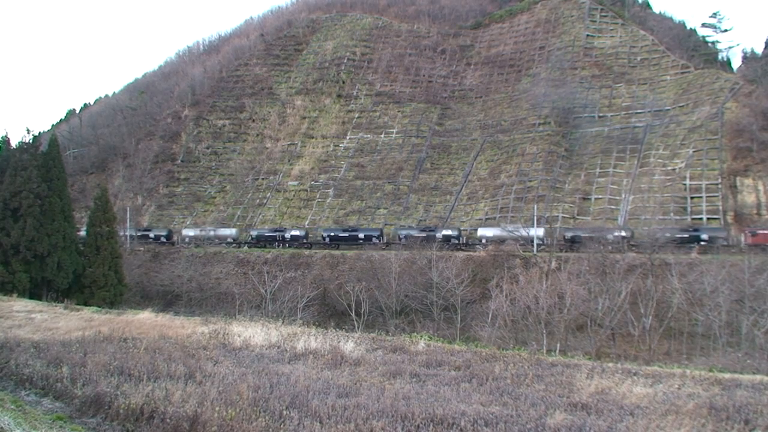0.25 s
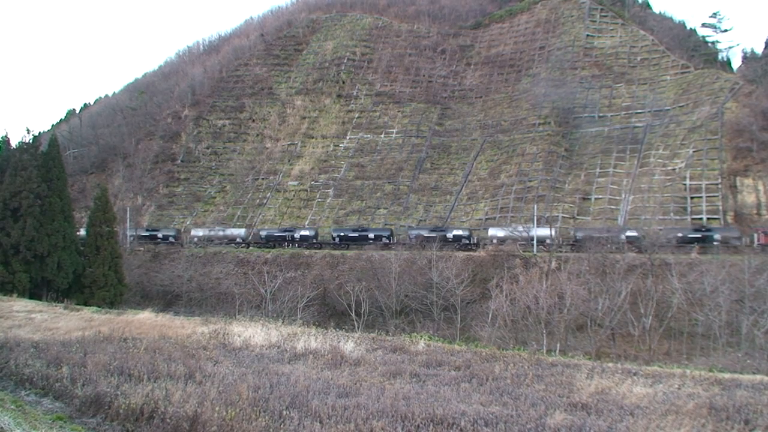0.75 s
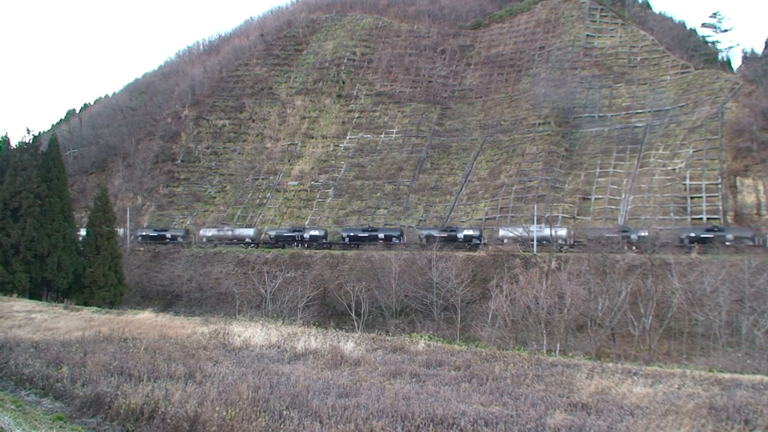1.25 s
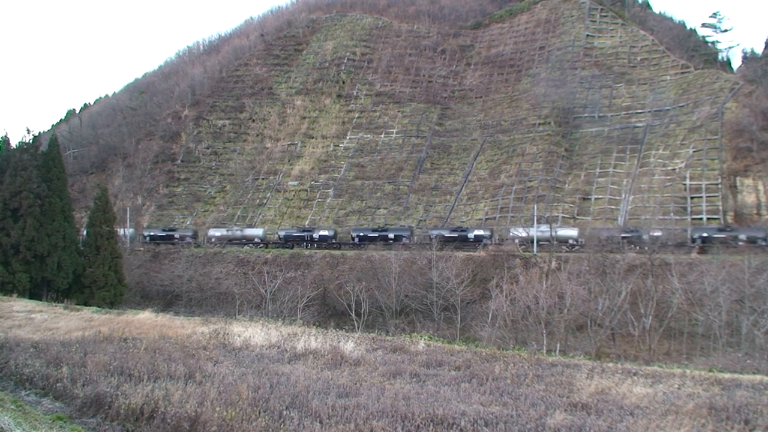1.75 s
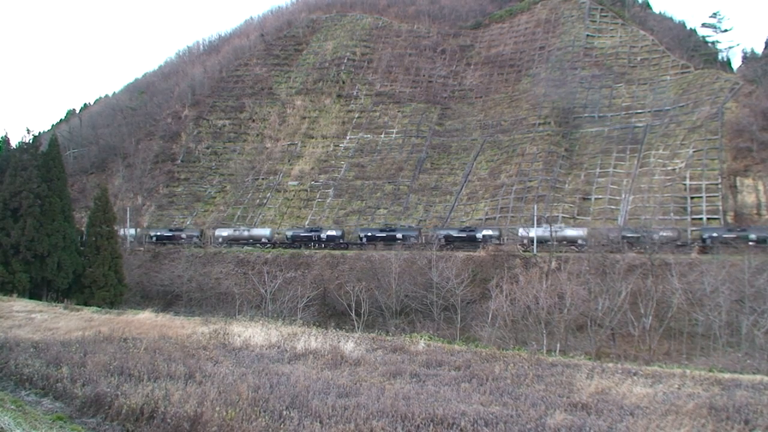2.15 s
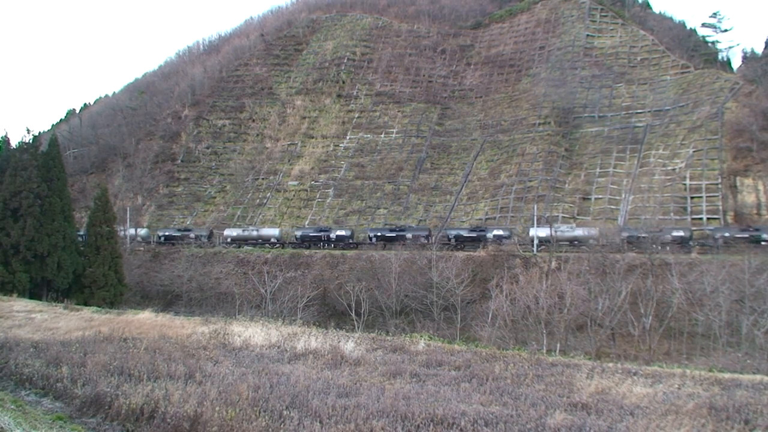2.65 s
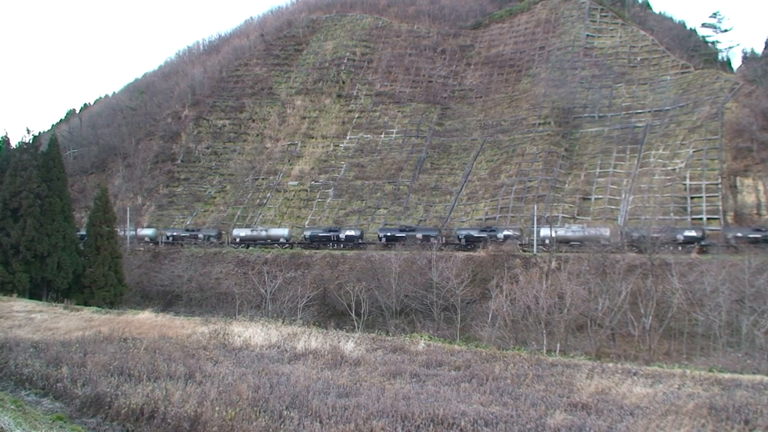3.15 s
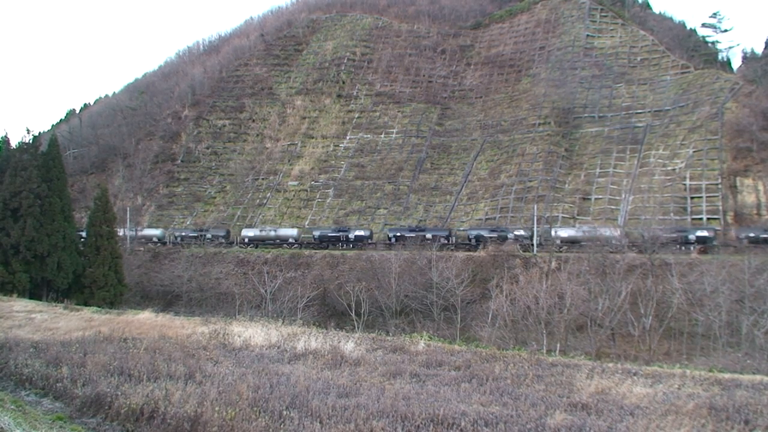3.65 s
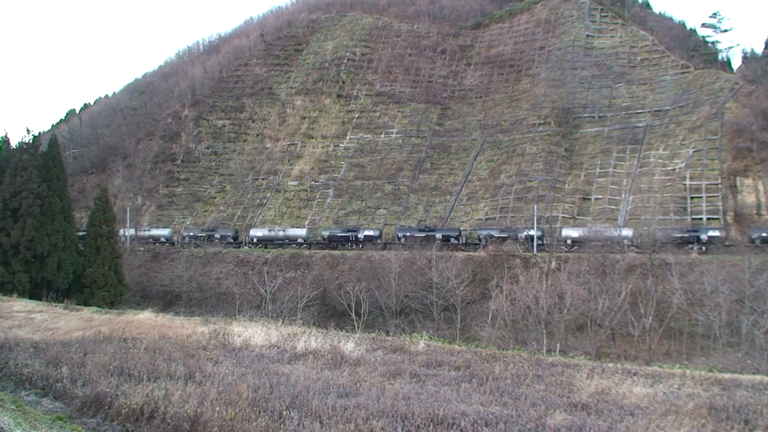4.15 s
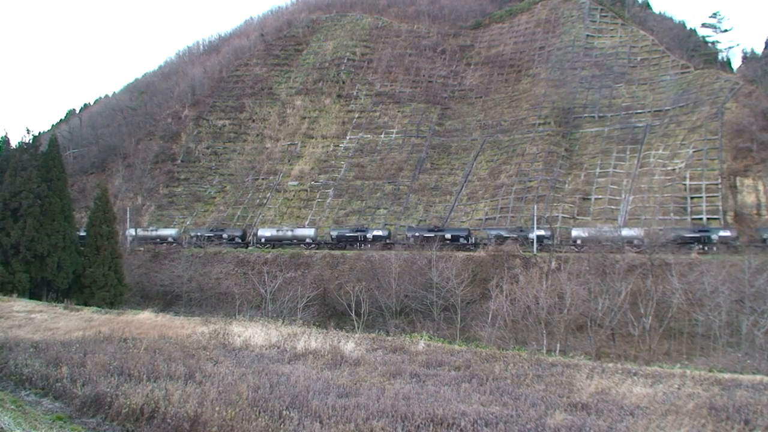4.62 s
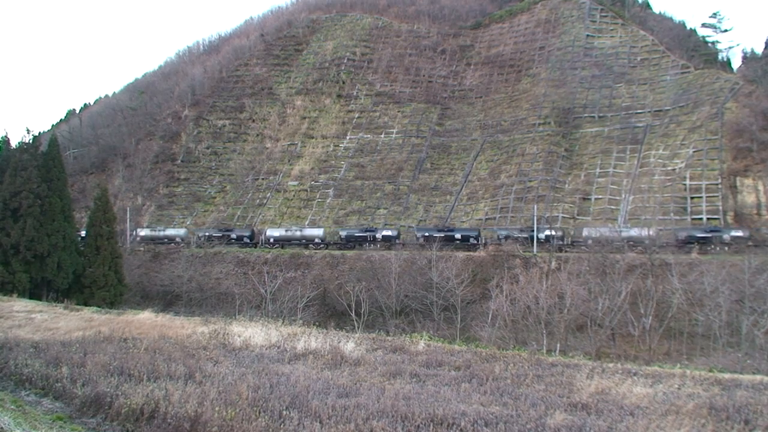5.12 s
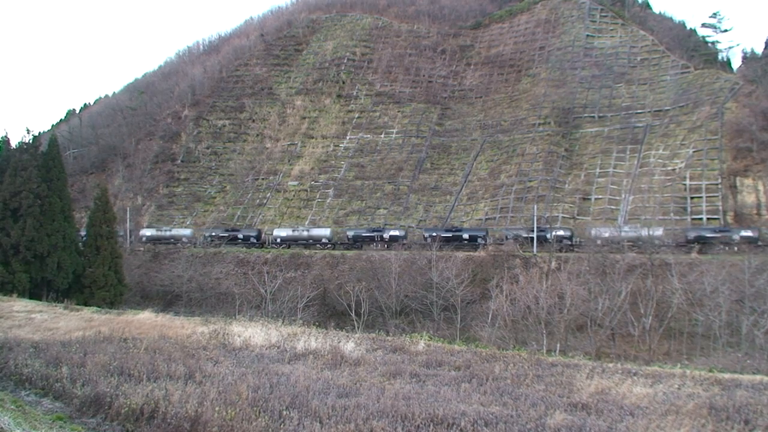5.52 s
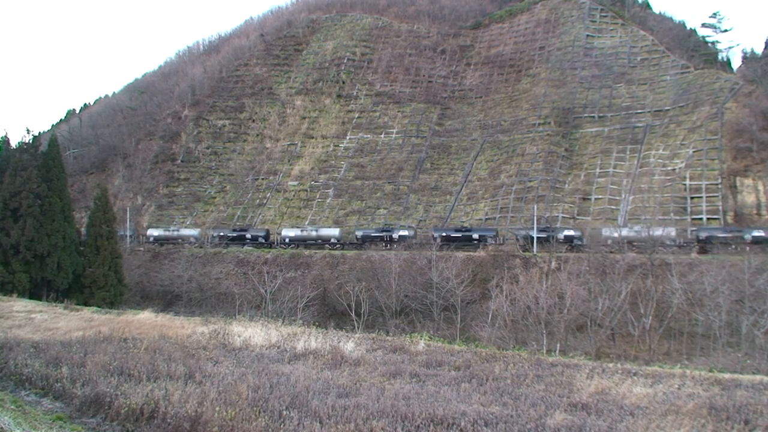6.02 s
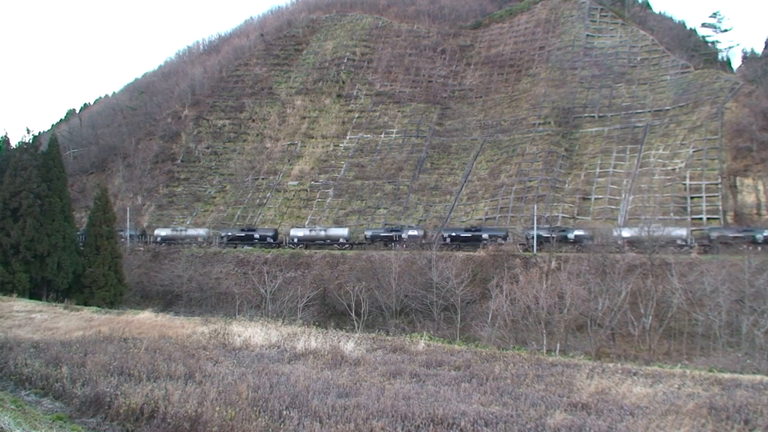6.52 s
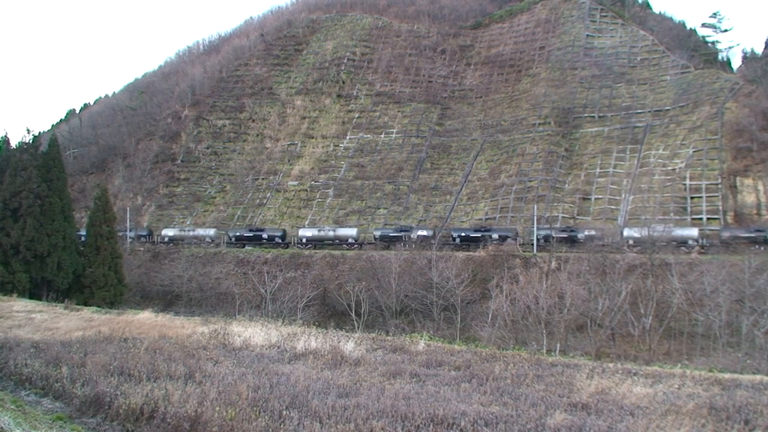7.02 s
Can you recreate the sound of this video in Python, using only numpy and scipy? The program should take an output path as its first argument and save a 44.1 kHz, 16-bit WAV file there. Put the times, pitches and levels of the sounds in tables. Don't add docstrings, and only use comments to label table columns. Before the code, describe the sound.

Outdoors across a valley, a slow goods train starts with a loud, shrill flange squeal, rough and ringing with many high steel tones. It breaks off into sharp coupling ticks and brief slips, then a second squeal bites and holds. When it stops abruptly, a quieter steady rolling grind remains with irregular metallic knocks, a diesel pulse and occasional rail joint ticks. Distant mono microphone, slight hillside echo.

```python
import sys
import numpy as np
from scipy import signal
from scipy.fft import rfft, irfft, next_fast_len
from scipy.io import wavfile
from scipy.ndimage import uniform_filter1d, map_coordinates

SR = 44100
rng = np.random.default_rng(int(sys.argv[2]) if len(sys.argv) > 2 else 0)


def pcm_store(signal):
    levels = np.round(np.clip(np.atleast_2d(signal), -1, 1) * 32767)
    wavfile.write(sys.argv[1], SR, levels.astype(np.int16).T)


def gain_from_db(level_db):
    decades = np.asarray(level_db, float) / 20
    return 10 ** decades


N = 321048
T = np.arange(N) / SR

# time in seconds, pressure in dB, brightness in dB.
FLANGE_PRESSURE = [
    [(0.0, -18, -21), (0.07, -20.5, -12), (0.2, -21, -16.5), (0.35, -19, -11.5), (0.51, -20.5, -16),
     (1.03, -23.5, -12.5), (1.22, -24, -15.5), (1.27, -21.5, -14), (1.415, -23, -17.5)],
    [(1.655, -39.5, -17), (1.755, -27, -13.5), (1.927, -55, -9), (1.949, -51, -24), (1.969, -26.5, -9),
     (2.005, -31.5, -25), (2.11, -46, -20)],
    [(2.115, -49, -17), (2.149, -31, -12), (2.213, -24, -16.5), (2.291, -23, -17), (2.707, -22, -14.5),
     (2.833, -24.5, -14), (3.155, -21.5, -14), (3.477, -21.5, -12.5), (3.525, -44, -25)],
]
# frequency in Hz, level in dB per Hz.
SCRAPE_COLOUR = [
    [(530, -42.5), (900, -23), (1130, -21.5), (1670, -16), (2150, 1), (2390, -7.5), (3580, -9), (4180, 2.5),
     (4660, -7), (5310, 5), (5910, -7), (6350, 0), (8550, -5.5), (15500, -38)],
    [(530, -42), (900, -21.5), (1120, -17.5), (1750, -15), (2120, 5), (2420, -6.5), (3670, -10.5),
     (4130, -1.5), (4600, -13.5), (5240, -1.5), (5840, -9.5), (7320, -10), (12800, -36), (15500, -49)],
]
# frequency in Hz, level in dB per Hz.
SLIP_COLOUR = [(880, -54), (1500, -14), (2030, 5), (4610, -18), (5290, -14), (6070, -23.5), (13000, -42),
               (15500, -53)]
# centre in Hz, width in Hz, level in dB.
MODE_GAPS = [
    (3680, 200, -1.5),
    (5870, 150, -2),
    (7750, 130, -4.5),
    (8800, 150, -4),
    (10000, 130, -4),
    (10450, 150, -4),
    (11350, 230, 1),
]
# frequency in Hz, level in dB.
WHEEL_MODES = [
    [(2837, -42), (4355, -63), (4990, -53), (6164, -59), (7214, -57), (7381, -50.5), (7461, -47),
     (8506, -45), (9609, -52), (10702, -53), (11779, -59.5), (12839, -66), (13544, -69), (13878, -70),
     (14045, -67)],
    [(5534, -56), (6449, -68), (7300, -64), (8064, -68), (8371, -60), (9464, -59), (11283, -67),
     (12608, -67)],
    [(2676, -49), (2826, -52), (2885, -53), (3370, -55), (4156, -51), (4317, -55), (5367, -54), (5712, -62),
     (6869, -51), (8113, -65), (8366, -49.5), (9232, -58), (9458, -56), (10261, -62), (10524, -61),
     (11574, -68), (14600, -72)],
]
SINGING_HZ = [
    (1126, 3014, 3316, 4076, 5166, 5453, 6288),
    (5130,),
    (3007, 4037, 5125, 6211, 7290),
]
# peak time in seconds, peak in dB, fade in seconds.
SINGING_FIRST = [
    [(0.078, -29, 0.062), (0.156, -30.5, 0.038), (0.664, -26, 0.01), (1.107, -36, 0.023)],
    [(0.148, -32, 0.03), (0.202, -27, 0.019), (0.271, -30, 0.03), (0.399, -23, 0.037), (0.696, -33, 0.052),
     (0.75, -32, 0.091), (1.02, -22, 0.015), (1.105, -41, 0.043)],
    [(0.084, -34, 0.024), (0.477, -38, 0.026), (0.66, -33, 0.074), (1.088, -39, 0.054), (1.127, -40, 0.09),
     (1.239, -32, 0.09)],
    [(0.094, -23, 0.032), (0.162, -23, 0.071), (0.204, -25, 0.065), (0.271, -21, 0.027),
     (0.315, -32, 0.081), (0.373, -28, 0.097), (0.467, -29, 0.12), (0.56, -29, 0.05), (0.641, -23, 0.021),
     (0.736, -32, 0.071), (0.78, -21.5, 0.042), (0.834, -29.5, 0.07), (0.924, -24, 0.022)],
    [(0.015, -27, 0.03), (0.138, -22.5, 0.057), (0.196, -22, 0.032), (0.393, -35, 0.025),
     (0.453, -39, 0.046), (0.599, -34, 0.09), (0.641, -38, 0.046), (1.056, -27.5, 0.048),
     (1.127, -30, 0.026)],
    [(0.152, -37, 0.075), (0.311, -38, 0.025), (0.595, -39, 0.028), (0.828, -29, 0.018), (0.922, -30, 0.09)],
    [(0.096, -26, 0.026), (0.156, -28, 0.06), (0.214, -40, 0.09), (0.257, -41, 0.081), (0.355, -35, 0.063),
     (0.405, -30, 0.038), (0.914, -42, 0.071)],
]
SINGING_SLIPS = [
    [(1.7, -40, 0.049), (1.78, -42, 0.068), (1.97, -33, 0.016)],
]
SINGING_SECOND = [
    [(2.251, -34, 0.079), (2.325, -19, 0.013), (2.393, -19.5, 0.018), (2.45, -30, 0.1), (2.714, -25, 0.043),
     (3.049, -32, 0.037), (3.422, -38, 0.038), (3.464, -31, 0.044)],
    [(2.221, -28.5, 0.054), (2.289, -41, 0.04), (2.425, -31, 0.044), (2.494, -28, 0.067),
     (2.648, -21.5, 0.019), (2.744, -24, 0.066), (2.826, -30.5, 0.079), (2.905, -36, 0.05),
     (3.055, -30, 0.04), (3.203, -24, 0.042), (3.291, -28, 0.026), (3.416, -29, 0.033), (3.46, -38, 0.072)],
    [(2.263, -23.5, 0.09), (2.334, -16.5, 0.062), (2.425, -22.5, 0.03), (2.488, -28, 0.029),
     (2.548, -24, 0.012), (2.594, -36, 0.048), (2.744, -31.5, 0.09), (2.834, -35, 0.048),
     (2.921, -25.5, 0.021), (3.117, -33, 0.068), (3.161, -23, 0.015)],
    [(2.456, -34, 0.15), (2.614, -30, 0.09), (2.72, -38, 0.071), (2.792, -40, 0.06), (2.969, -34, 0.029),
     (3.125, -32, 0.018), (3.281, -33, 0.032), (3.416, -30, 0.024), (3.494, -32.5, 0.042)],
    [(3.147, -37, 0.039), (3.414, -40, 0.036), (3.474, -34, 0.06)],
]
# peak time in seconds, peak in dB, fade in seconds.
HOWL_FLARES = [(0.066, -18, 0.035), (.27, -34, 0.026), (.51, -19, 0.91), (1.11, -28, 0.12),
               (1.264, -26, 0.073), (1.41, -25, 0.11), (1.969, -16.5, 0.014), (2.11, -8, 0.018),
               (2.291, -14, 0.03), (2.451, -16, 0.062), (2.62, -27, 0.18), (2.707, -14.5, 0.042),
               (2.963, -19, 0.16), (3.213, -30, 0.016), (3.5, -23, 0.25)]
# time in seconds, pitch in Hz, level in dB.
FLANGE_CHIRPS = [(0.054, 2650, -21), (0.07, 2194, -15), (0.082, 3320, -27), (0.12, 2060, -22),
                 (0.142, 2630, -25), (0.182, 2500, -24), (0.263, 2630, -21), (0.285, 2215, -19.5),
                 (0.319, 2638, -32), (0.321, 2203, -23), (0.359, 2780, -35), (0.375, 2035, -19),
                 (0.419, 2050, -21), (0.477, 2057, -16), (0.477, 3280, -29), (0.525, 2218, -21),
                 (0.527, 2810, -23), (0.549, 2515, -19), (0.587, 2105, -22), (0.595, 2640, -28),
                 (0.605, 2780, -29), (0.637, 2760, -22), (0.639, 2150, -24), (0.66, 3340, -29),
                 (0.698, 2560, -20), (0.75, 3060, -25), (0.846, 2496, -20), (0.908, 2420, -28),
                 (1.008, 2580, -22), (1.086, 3316, -30), (1.094, 2820, -21), (1.098, 2500, -23),
                 (1.127, 3316, -25), (1.241, 2630, -26), (1.275, 2220, -14), (1.325, 2530, -23),
                 (1.357, 2720, -26), (2.243, 2470, -24), (2.255, 2907, -24), (2.263, 2210, -21),
                 (2.293, 2140, -23), (2.353, 2670, -23), (2.401, 2110, -18.5), (2.428, 2950, -25),
                 (2.45, 2143, -32), (2.46, 2440, -25), (2.482, 2060, -18), (2.526, 2036, -21.5),
                 (2.576, 2870, -27), (2.61, 2190, -18), (2.654, 2860, -24), (2.674, 2530, -27),
                 (2.714, 2085, -16), (2.953, 2580, -26), (2.967, 2080, -26), (3.079, 2650, -24),
                 (3.117, 3252, -25), (3.163, 2659, -22.5), (3.213, 2190, -22.5), (3.396, 3190, -23)]
# time in seconds, peak in dB, low clank in dB.
COUPLING_TICKS = [(1.51, -32.5, 8), (1.563, -26, -14), (1.6691, -27, -10), (1.695, -25, -9),
                  (1.74, -16, -13), (1.8128, -21, 2.5), (1.8831, -30, -2), (1.958, -29, 6),
                  (1.966, -14.5, 0), (2.0786, -23.5, 1), (2.127, -16, -20), (2.149, -9.5, -19),
                  (2.1899, -11, -6), (3.5, -26, -6), (3.714, -20.5, 0), (5.3373, -33, -6), (5.441, -31, 5),
                  (5.6545, -25.5, -6), (5.8606, -24, 3.5), (6.011, -27.5, -10), (6.1888, -28.5, 8),
                  (6.3225, -30, -6)]
# frequency in Hz, level in dB.
TICK_COLOUR = [(1000, -33), (3000, -30), (5000, -13.5), (5700, -8), (7000, -11.5), (8500, -24),
               (10000, -32), (15500, -72)]
# time in seconds, rolling in dB, knock in dB.
TRAIN_LEVELS = [(0.0, -33.5, -48), (0.4, -34, -32.5), (0.83, -32, -27.5), (1.15, -34, -25),
                (1.34, -31.5, -35), (2.0, -33, -35), (2.64, -33.5, -30.5), (3.6, -34.5, -31),
                (4.58, -34, -39.5), (4.87, -33, -35.5), (5.21, -34.5, -42), (5.8, -34.5, -36),
                (6.51, -34.5, -38.5), (7.28, -34.5, -41)]
# frequency in Hz, level in dB per Hz.
GRIND_COLOUR = [(15, -68), (30, -48), (180, -23.5), (410, -10), (600, -11.5), (900, -11), (1700, -15.5),
                (2700, -13.5), (4260, -21.5), (6200, -35.5), (15500, -61)]
# frequency in Hz, width in Hz, level in dB.
RAIL_MODES = [(606, 61, 5), (1184, 213, 9), (2147, 114, 17)]
# frequency in Hz, width in Hz, level in dB, knock decay t60 in seconds.
CASING_MODES = [(1182, 145, -8.5, 0.19), (2128, 125, 1, 0.068), (2850, 69, -9.5, 0.16),
                (3380, 520, -17, 0.21), (4130, 660, -15.5, 0.073)]
CYLINDER_DB = [
    [1, 2, 1.1, -0.35, -0.3, 1.1],
    [0, 5.3, 7.4, -1.5, 1, 1.9],
]
# start in seconds, peak in dB, casing pitch in Hz.
HARD_KNOCKS = [(1.5975, -18, 2210), (1.6394, -18, 2100), (1.9123, -9.5, 2130), (1.9567, -12, 2190),
               (2.0265, -21, 2100), (3.5153, -18, 2150), (3.5458, -19, 2100), (3.6974, -21, 2180),
               (3.7368, -27, 2090), (3.7832, -27, 2100), (3.8805, -14, 2150), (3.9688, -15.5, 2190),
               (4.0057, -24, 2300), (4.0596, -21, 2085), (4.096, -21, 2280), (4.1439, -18, 2100),
               (4.1953, -22, 2100), (4.2397, -20, 2110), (4.2836, -14.5, 2100), (4.326, -19, 2180),
               (4.3664, -19, 2245), (4.4118, -21, 2120), (4.6163, -18, 2150), (4.6812, -21, 2080),
               (4.7211, -25, 2180), (4.9506, -21, 2120), (5.0339, -18, 2165), (5.2973, -25, 2120),
               (5.42, -22, 2150), (5.6091, -25, 2280), (5.663, -16, 2160), (5.7493, -19, 2100),
               (6.0241, -19, 2035), (6.1523, -17, 2080), (6.1913, -23, 2200), (6.2401, -16, 2170),
               (6.288, -21, 2120), (6.4646, -14, 2170), (6.6866, -17, 2070), (6.7784, -14, 2130),
               (6.8862, -19, 2130), (6.9421, -17.5, 2160), (7.0004, -14, 2170), (7.0463, -21, 2120),
               (7.0902, -25, 2200), (7.2249, -19, 2120), (5.8477, -21, 2060), (5.978, -19, 2150)]
# start in seconds, peak in dB, casing pitch in Hz.
LOW_KNOCKS = [(3.8333, -21, 1300), (3.9171, -23, 1310), (4.0812, -27, 1110), (4.1872, -25, 1140),
              (4.3831, -29, 1270), (4.7637, -23, 1185), (4.9807, -18, 1183), (5.0715, -27, 1170),
              (5.2496, -20, 1120), (5.293, -19, 1140), (5.3383, -27, 1280), (5.7484, -31, 1070),
              (6.5796, -19.5, 1203), (6.837, -18.5, 1217), (6.8678, -21, 1167), (7.0094, -23, 1170),
              (7.057, -28, 1220), (7.0935, -21, 1167)]
# pitch in Hz, then swells of peak time in seconds, peak in dB, fade in seconds.
BODY_HUMS = [
    (445, [(1.77, -39.5, 0.052), (2.5, -40.5, 0.33), (2.95, -40, 0.083)]),
    (429, [(4.77, -43, 0.068), (5.0, -40.5, 0.3), (5.3, -41, 0.27), (5.65, -45, 0.045), (6.05, -47.5, 0.98), (6.6, -52, 0.058)]),
    (4100, [(1.27, -31, 0.058), (1.35, -30, 0.037), (1.44, -38, 0.093)]),
    (4037, [(3.52, -37, .1)]),
    (8366, [(3.12, -42, .1), (3.33, -41, .07), (3.45, -43, .07)]),
    (8506, [(.37, -37, .05), (.85, -41, .15), (1.04, -44, .08), (1.41, -46, .06)]),
    (5160, [(5.68, -52, .05), (5.89, -51, .08), (6.02, -51, 0.07)]),
    (12602, [(3.52, -63, .12)]),
]
# peak time in seconds, peak in dB, fade in seconds.
FLANGE_FIZZ = [(5.306, -62, .12), (5.95, -65, 0.2), (6.322, -59, 0.03)]
# frequency in Hz, t60 in seconds.
HILL_DECAY = [(200, 0.91), (2000, 1), (8000, 0.58), (15000, 0.58)]
# peak time in seconds, peak in dB, fade in seconds.
WIND_GUSTS = [(.83, -49, 0.11), (1.1, -37, 0.08), (1.33, -37.5, 0.085), (1.56, -43.5, 0.13),
              (3.51, -57, .1), (3.71, -65, 0.046), (5.13, -64, .07), (6.51, -57, .25)]
# frequency in Hz, level in dB.
WIND_COLOUR = [(25, -50), (60, -11), (110, -3.5), (200, 0.5), (400, -11), (800, -63)]

HOWL_FLOOR_DB, HOWL_SPILL_DB = -30, -16.5
FLICKER_DB = 1.3
RISE_SHARE = 0.48
CHIRP_S, CHIRP_SAG_HZ_PER_S = 0.01, 1300
TOP_EDGE_DB, TOP_FOLLOWS = -34.5, 0.63
JOINTS_FROM_S = 3.6
CRACK_DB, CRACK_T60 = -20, 0.014
THUMP_DB, THUMP_T60 = -20, 0.09
FIRING_HZ, FIRST_S = 22.41, 0.031
FIZZ_HZ, FIZZ_WIDE_HZ = 8270, 250
BREEZE_DB = -92


def unit(x):
    return x / np.sqrt(np.mean(x ** 2) + 1e-20)


def along(points, hz):
    f, v = np.transpose(points)
    return np.interp(np.log(hz + 1), np.log(f + 1), v)


def gains(rows):
    s, *columns = np.transpose(rows)
    since_start = T - s[0] + (s[0] < 1e-3)
    until_end = s[-1] - T + (s[-1] > T[-1] - 1e-2)
    edge = np.clip(np.minimum(since_start, until_end) * 50, 0, 1)
    return [edge * gain_from_db(np.interp(T, s, c)) for c in columns]


def swells(rows, order=1):
    s, db, fade = np.transpose(rows)[..., None]
    coarse = T[::64]
    late = (coarse - s) / np.abs(fade)
    each = gain_from_db(db - 10 * np.maximum(late, -late / RISE_SHARE))
    return np.interp(T, coarse, (each ** order).sum(0) ** (1 / order))


def wobble(rate):
    coarse = T[::64]
    knots = rng.standard_normal(int(N * rate / SR) + 4)
    return np.interp(T, coarse, map_coordinates(knots, [coarse * rate]))


def filtered(x, response):
    m = next_fast_len(N + SR // 4)
    return irfft(rfft(x, m) * response(np.fft.rfftfreq(m, 1 / SR)), m)[:N]


def band(x, lo_hz, hi_hz):
    def response(hz):
        return 1 / (1 + (lo_hz / (hz + 1)) ** 12) - 1 / (1 + (hi_hz / (hz + 1)) ** 12)
    return filtered(x, response)


def modes(rows):
    def response(f):
        return sum((-1) ** k * g * 1j * f * w / (c * c - f * f + 1j * f * w)
                   for k, (c, w, g) in enumerate(rows))
    return response


def rush(spectrum, patchy_db, size=(4, 8)):
    z = signal.stft(rng.standard_normal(N + 1024), nperseg=1024)[2]
    field = uniform_filter1d(rng.standard_normal(z.shape), size=size[0], axis=0)
    field = uniform_filter1d(field, size=size[1], axis=1)
    x = signal.istft(z * gain_from_db(patchy_db * unit(field)), nperseg=1024)[1][:N]
    return filtered(x, lambda hz: gain_from_db(along(spectrum, hz)))


def tone(hz, blur_hz):
    return np.sqrt(2) * np.sin(2 * np.pi * np.cumsum(hz + blur_hz * wobble(24.89)) / SR)


def bursts(times, dbs, t60, rise=0.00031):
    hits = np.zeros(N)
    hits[np.round(np.asarray(times) * SR).astype(int)] = gain_from_db(dbs)
    fall = signal.lfilter([1], [1, -gain_from_db(-60 / (t60 * SR))], hits)
    keep = np.exp(-1 / (rise * SR))
    return rng.standard_normal(N) * signal.lfilter([1 - keep], [1, -keep], fall)


def squeal(rows, colour, wheel, low_db, sing_hz, sing):
    mid, bright = gains(rows)
    high = mid * bright
    rasp = scrape(rows, colour, mid, high, low_db)
    wheel = [m for m in wheel if all(abs(m[0] - hz) > 20 for hz in sing_hz)]
    lower = rung([m for m in wheel if m[0] < 7000], mid, t60=0.45, beat_db=4.0, blur_hz=6.7)
    upper = rung([m for m in wheel if m[0] >= 7000], high, t60=0.52, beat_db=4.5, blur_hz=13.7)
    return rasp + lower + upper + singing(mid, sing_hz, sing)


def scrape(rows, colour, mid, high, low_db):
    def gaps(hz):
        return gain_from_db(sum(db * np.exp(-0.5 * ((hz - c) / w) ** 2) for c, w, db in MODE_GAPS))

    noise = filtered(rush(colour, patchy_db=3.9, size=(1, 6)), gaps)
    touching = gains([(rows[0][0], 0), (rows[-1][0], 0)])[0]
    flare = touching * swells(HOWL_FLARES)
    howl = flare + gain_from_db(HOWL_FLOOR_DB) * mid
    low = gain_from_db(low_db) * mid + gain_from_db(HOWL_SPILL_DB) * flare
    howl_band = band(noise, 1900, 2350)
    low_band = band(noise, 10, 3600) - howl_band
    chatter = gain_from_db(0.3 * wobble(14) + 1.1 * wobble(45))
    return chatter * (gain_from_db(-10.0) * howl * unit(howl_band)
                      + gain_from_db(-1.0) * low * unit(low_band)
                      + gain_from_db(-6.5) * mid * unit(band(noise, 3600, 7600))
                      + gain_from_db(-3.0) * high * unit(band(noise, 7600, 21000)))


def rung(wheel, push, t60, beat_db, blur_hz):
    on = np.flatnonzero(push > 1e-9)
    push = push / np.sqrt(np.mean(push[on] ** 2))
    span = slice(on[0], min(on[-1] + SR // 2, N))
    keep = np.exp(-2 * np.log(1000) / (t60 * SR))
    start = [keep * push[on[0]] ** 2]
    energy = signal.lfilter([1 - keep], [1, -keep], push[span] ** 2, zi=start)[0]
    t, out = T[span] - T[on[0]], np.zeros(N)
    for hz, db in wheel:
        knots = rng.standard_normal((3, 80))
        swell, flutter, drift = (np.interp(t * rate, np.arange(80), row)
                                 for rate, row in zip((5, 35, 14), knots))
        beat = 0.5 * (swell - swell.mean()) + 1.41 * flutter
        phase = 2 * np.pi * np.cumsum(hz + blur_hz * drift) / SR
        out[span] += gain_from_db(db - 1.9 + beat_db * beat) * np.sin(phase)
    out[span] *= np.sqrt(2 * np.abs(energy))
    return out


def singing(mid, sing_hz, sing):
    keep = gain_from_db(-60 / (0.6 * SR))
    ringing = signal.lfilter([1 - keep], [1, -keep], mid)
    out = np.zeros(N)
    for hz, flares in zip(sing_hz, sing):
        flicker = gain_from_db(1.0 + FLICKER_DB * wobble(60))
        level = swells(flares, order=4) + gain_from_db(-22.5) * ringing
        out += flicker * level * tone(hz, blur_hz=5.54)
    return out


def chirps():
    out, t = np.zeros(N + SR), T[:SR // 10] - T[SR // 20]
    luck = rng.standard_normal((len(FLANGE_CHIRPS), 2))
    for (s, hz, db), (bend, long) in zip(FLANGE_CHIRPS, luck):
        bell = gain_from_db(db + 2.0) * np.exp(-0.5 * (t / (CHIRP_S * gain_from_db(2.5 * long))) ** 2)
        pitch = hz + CHIRP_SAG_HZ_PER_S * bend * t / 2
        out[round(s * SR):][:len(t)] += bell * np.sin(2 * np.pi * pitch * t)
    return out[SR // 20:][:N]


def ticks():
    s, db, clank_db = np.transpose(COUPLING_TICKS)
    puff = bursts(s, db + 6.5, t60=0.049)
    bright = filtered(puff, lambda hz: gain_from_db(along(TICK_COLOUR, hz)))
    top = band(bursts(s, TOP_EDGE_DB + TOP_FOLLOWS * (db + 16), t60=0.05), 7500, 10100)
    steel = modes([(2120, 410, 1.35), (3120, 590, 0.45), (4150, 120, 0.58)])
    clank = filtered(bursts(s, db + clank_db + 8.5, t60=0.11), steel)
    return bright + top + band(clank, 300, 6000)


def cracks():
    s, db = np.transpose([row[:2] for row in COUPLING_TICKS if row[0] > JOINTS_FROM_S])
    crack = bursts(s, np.minimum(db, -24) + CRACK_DB, CRACK_T60, rise=0.0001)
    thump = bursts(s, THUMP_DB + 0.5 * (db + 27), THUMP_T60, rise=0.003)
    return band(crack, 5400, 11000) + band(thump, 170, 420)


def train():
    grind_gain, knock_gain = gains(TRAIN_LEVELS)
    steady = knock_gain * engine() + grind_gain * rolling()
    hard = knocks(HARD_KNOCKS, gain_db=5.5, t60=0.038, rise=0.0046)
    low = knocks(LOW_KNOCKS, gain_db=1.5, t60=0.073, rise=0.0064)
    return steady + hard + low


def engine():
    k = np.arange(int((T[-1] - FIRST_S) * FIRING_HZ) - 1)
    luck = rng.standard_normal((len(k), len(CASING_MODES) + 1))
    when = np.abs(FIRST_S + k / FIRING_HZ + 0.004 * luck[:, -1])
    fired = 0
    for i, (hz, width, db, t60) in enumerate(CASING_MODES):
        cylinder = np.take(CYLINDER_DB[i == 2], k % 6)
        strength = db + cylinder + 5 * np.tanh(luck[:, i] / 1.2)
        puffs = bursts(when, strength, t60, rise=0.003)
        fired = fired + signal.lfilter(*signal.iirpeak(hz, hz / width, SR), puffs)
    return unit(band(fired, 550, 5730))


def knocks(rows, gain_db, t60, rise):
    out, t = np.zeros(N + SR), T[:SR // 10]
    for s, db, hz in rows:
        envelope = gain_from_db(db + gain_db - 60 * t / t60) * (1 - np.exp(-t / rise))
        out[round(s * SR):][:len(t)] += envelope * np.sin(2 * np.pi * hz * t)
    return out[:N]


def rolling():
    rail = modes([(hz, width, gain_from_db(db)) for hz, width, db in RAIL_MODES])

    def with_rail(hz):
        return np.sqrt(1 + np.abs(rail(hz)) ** 2 / (1 + (hz / 3000) ** 8))

    grind = filtered(rush(GRIND_COLOUR, patchy_db=1.23), with_rail)
    return grind / np.std(band(grind, 250, 1470)) * gain_from_db(0.6 * wobble(6))


def hums():
    tones = np.zeros(N)
    for hz, rows in BODY_HUMS:
        shimmer = gain_from_db(0.59 * wobble(40) * (1 + hz / 1500))
        tones += swells(rows) * tone(hz, blur_hz=hz / 500) * shimmer
    ring = modes([(FIZZ_HZ, FIZZ_WIDE_HZ, 1)])
    fizz = filtered(rng.standard_normal(N), lambda hz: ring(hz) ** 2)
    return tones + swells(FLANGE_FIZZ) * unit(fizz)


def hillside(x):
    hz, t, z = signal.stft(rng.standard_normal(SR // 2), SR, nperseg=256)
    decay = gain_from_db(-60 * t / along(HILL_DECAY, hz)[:, None])
    tail = signal.istft(z * decay, SR, nperseg=256)[1]
    return signal.fftconvolve(np.pad(x, (400, 0)), tail / np.linalg.norm(tail))[:N]


def wind():
    air = unit(gain_from_db(1.5 * wobble(3.15)) * rush(WIND_COLOUR, patchy_db=3.0))
    return (gain_from_db(BREEZE_DB) + swells(WIND_GUSTS)) * air


def microphone_hiss():
    return gain_from_db(-68.5) * signal.lfilter([1, -0.3], [1], rng.standard_normal(N))


def scene():
    first = squeal(FLANGE_PRESSURE[0], SCRAPE_COLOUR[0], WHEEL_MODES[0], low_db=-4.5,
                   sing_hz=SINGING_HZ[0], sing=SINGING_FIRST)
    slips = squeal(FLANGE_PRESSURE[1], SLIP_COLOUR, WHEEL_MODES[1], low_db=-22,
                   sing_hz=SINGING_HZ[1], sing=SINGING_SLIPS)
    second = squeal(FLANGE_PRESSURE[2], SCRAPE_COLOUR[1], WHEEL_MODES[2], low_db=-2,
                    sing_hz=SINGING_HZ[2], sing=SINGING_SECOND)
    wheels = first + slips + second + chirps()
    couplings = ticks()
    echo = gain_from_db(-13) * hillside(wheels + 0.5 * couplings)
    near = wheels + couplings + cracks() + train() + hums()
    mix = near + echo + gain_from_db(-3.5) * wind() + microphone_hiss()
    return mix[None]


def roll_off(x):
    return signal.sosfilt(signal.butter(12, 15650, fs=SR, output="sos"), x)


def record(dry):
    return roll_off(dry)


dry = scene()
out = record(dry)
pcm_store(out)
```